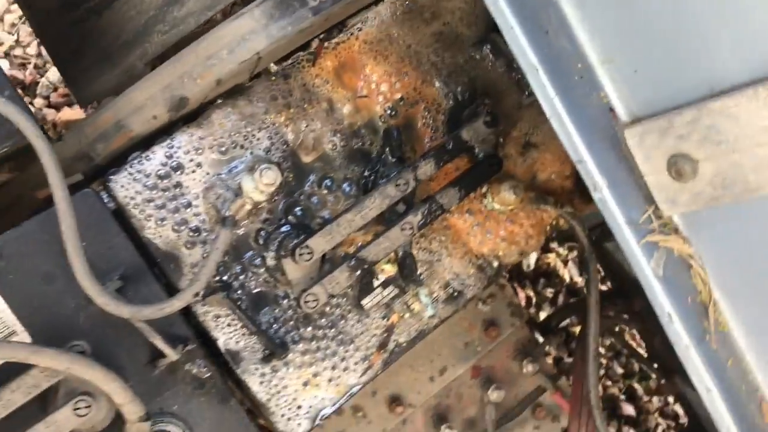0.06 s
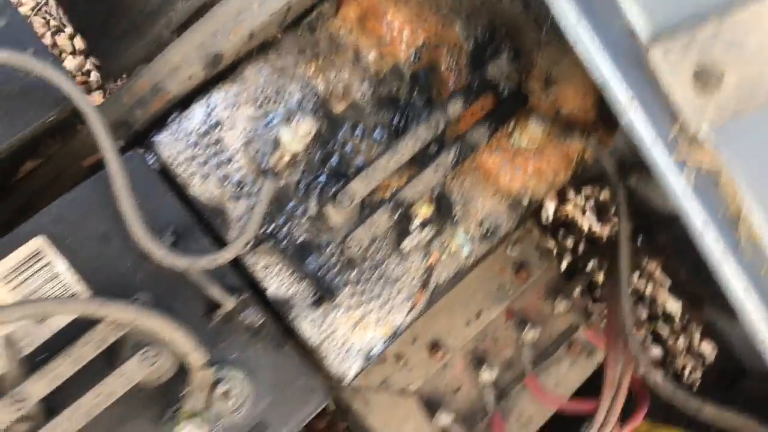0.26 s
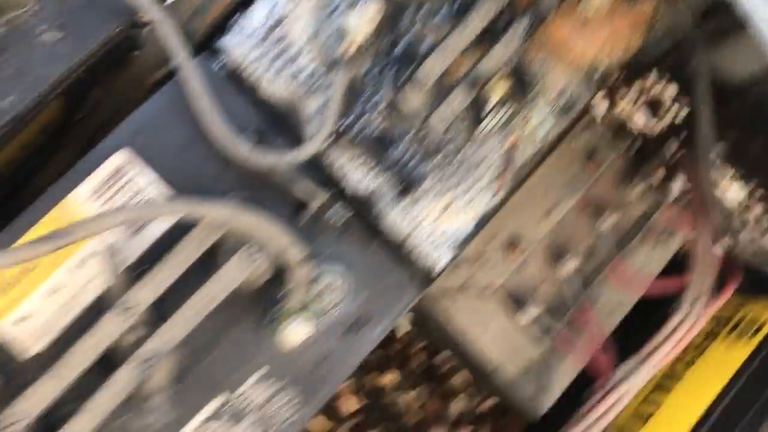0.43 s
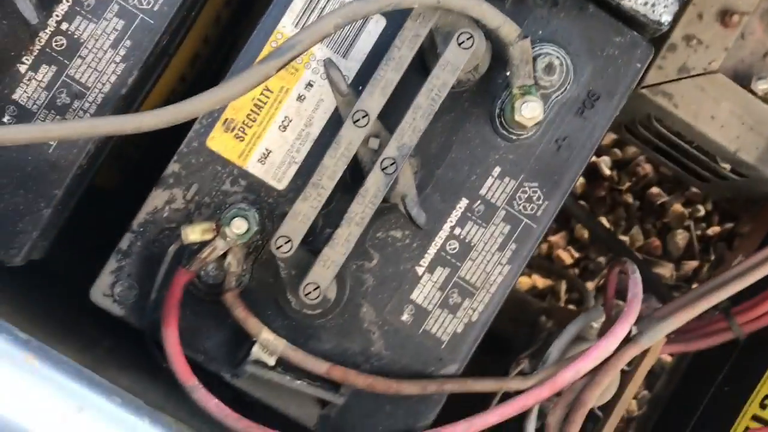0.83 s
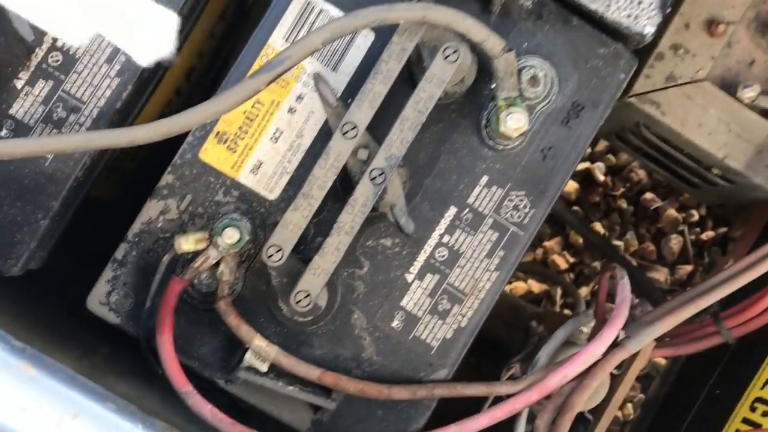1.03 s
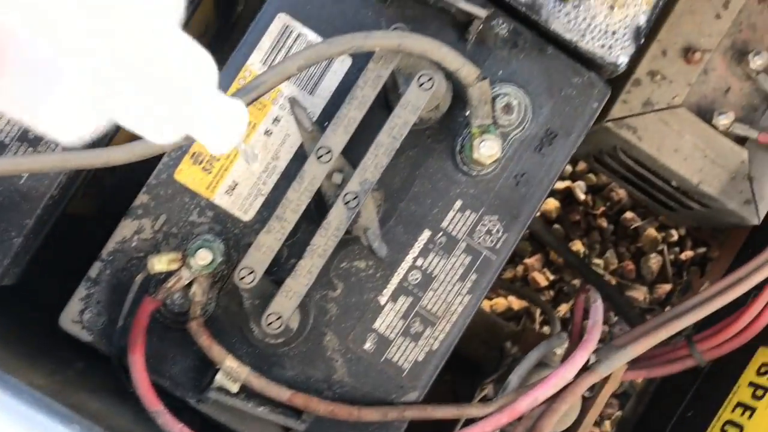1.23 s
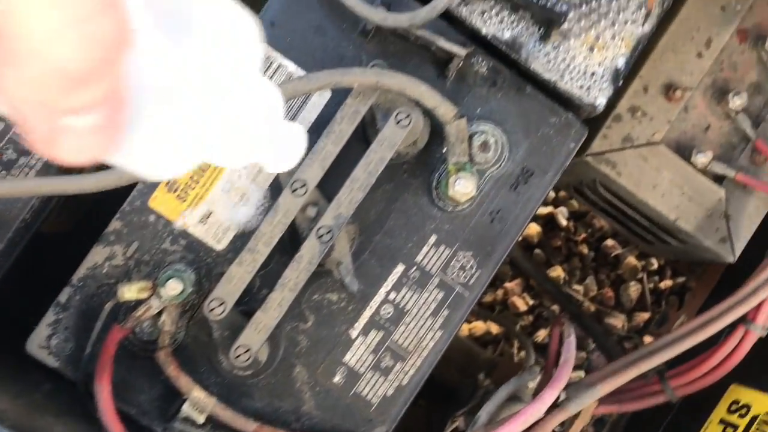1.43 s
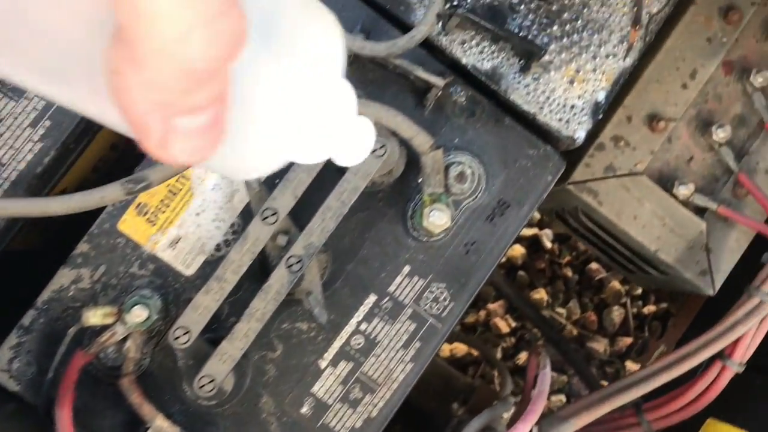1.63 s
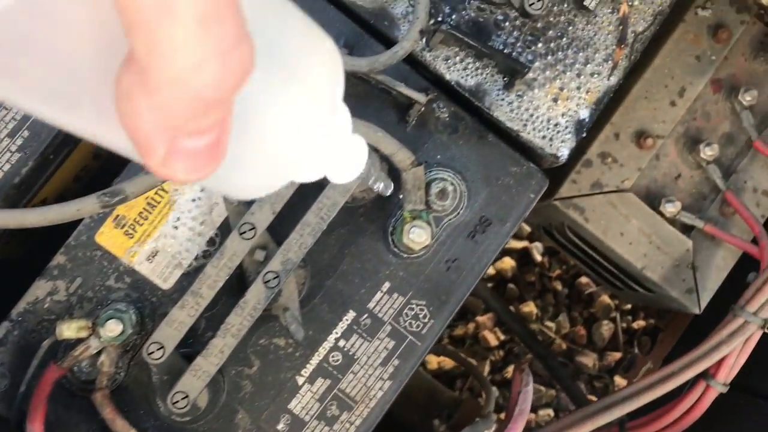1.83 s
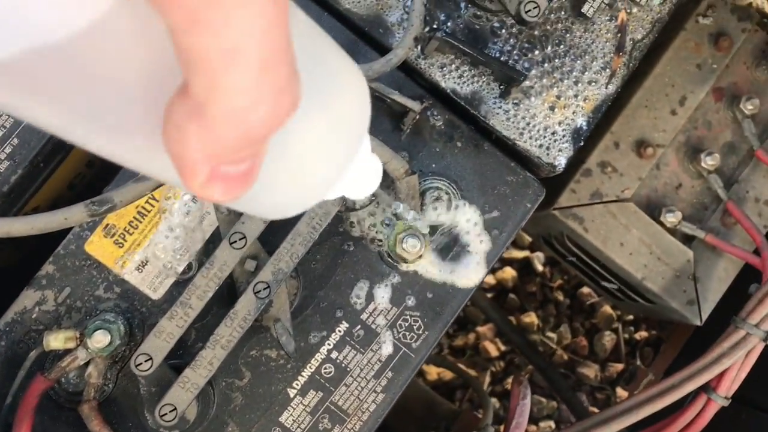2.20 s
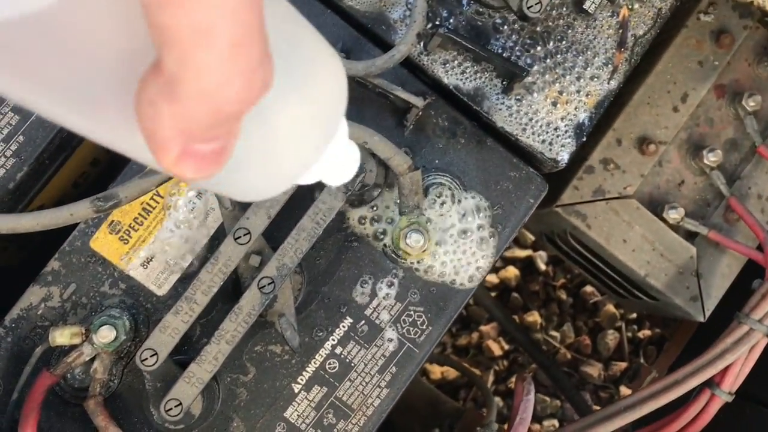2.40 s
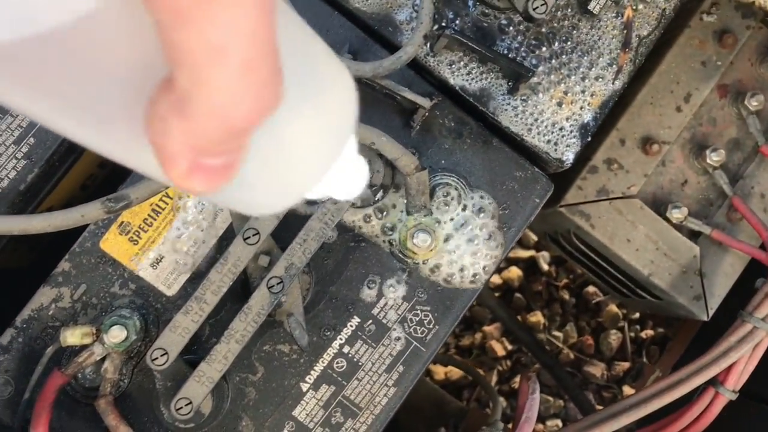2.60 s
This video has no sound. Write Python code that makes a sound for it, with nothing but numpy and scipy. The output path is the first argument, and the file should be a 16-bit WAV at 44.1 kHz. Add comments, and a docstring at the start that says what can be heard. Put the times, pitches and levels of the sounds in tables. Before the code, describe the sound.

Liquid fizzes and foams on a corroded battery terminal after a plastic bottle clunks.

```python
"""A plastic bottle clunks and scrapes as it is picked up, close by in a quiet garage, then clicks once
in the hand. Liquid runs onto a battery top, which fizzes thinly, then reaches the corroded terminal,
which foams in a full hiss. All the fizz is made of thousands of tiny bursting bubbles. Older foam
hisses faintly in the background, single bubbles pop, and handling bumps and ticks sit over a low
room rumble."""
import sys
import numpy as np
from scipy import signal
from scipy.fft import rfft, irfft
from scipy.io import wavfile
from scipy.ndimage import uniform_filter1d

SR = 44100
rng = np.random.default_rng(int(sys.argv[2]) if len(sys.argv) > 2 else 0)


def inscribe(sig):
    """Save sig as 16-bit PCM at rate SR to the path in sys.argv[1].

    A 1-D sig is mono; a 2-D sig holds one channel per row.
    Samples are clipped to [-1, 1] before scaling.
    """
    pcm = np.round(np.clip(np.atleast_2d(sig).T, -1, 1) * 32767)
    wavfile.write(sys.argv[1], SR, pcm.astype(np.int16))


N = 121275
TIME = np.arange(N) / SR


def amp(db):
    """Turns decibels into a gain."""
    return 10 ** (np.asarray(db) / 20)

def unit_level(x):
    """Scales a signal to an average (rms) level of one."""
    return x / np.sqrt(np.mean(x ** 2) + 1e-20)

def curve(points, t=TIME):
    """Joins points by straight lines in time."""
    return np.interp(t, *np.transpose(points))

def at_pitch(points, hz):
    """Joins points by straight lines, with octaves evenly spaced."""
    pitches, values = np.transpose(points)
    return np.interp(np.log(hz + 1), np.log(pitches + 1), values)

def add(mix, start_s, sound):
    """Mixes a sound in at a given time."""
    part = mix[max(round(start_s * SR), 0):][:len(sound)]
    part += sound[:len(part)]

def colour(x, tone):
    """Makes some pitches louder than others, at an overall level of one."""
    gain = amp(at_pitch(tone, np.fft.rfftfreq(len(x), 1 / SR)))
    return unit_level(irfft(rfft(x) * gain, len(x)))

def ringing_noise(tone, ring_times, hold_s=0):
    """Noise that holds, then dies away. A ring time is how long a fade of 60 dB takes."""
    hz, t, bands = signal.stft(colour(rng.standard_normal(SR // 2), tone), SR, nperseg=128)
    fade_db = -60 * np.maximum(t - hold_s, 0) / at_pitch(ring_times, hz)[:, None]
    return signal.istft(bands * amp(fade_db), SR, nperseg=128)[1]


# Tone of the room's rumble and of its air (pitch [Hz], level [dB])
RUMBLE_TONE = [(30, -37.5), (55, -8), (95, 0), (170, -5), (230, -3), (310, -11.5), (450, -24), (900, -48)]
AIR_TONE = [(150, 0), (400, 0), (700, 2), (1300, -2.5), (2200, -5.5), (3800, -7.5), (6000, -37.5),
            (15000, -37.5)]
# How each sinks, then comes up with the microphone's gain (time [s], level [dB])
RUMBLE_LEVEL = [(0, -58.5), (.3, -63.5), (.6, -70), (1.0, -71.5), (1.44, -72), (1.54, -63), (2.1, -64),
                (2.75, -63.5)]
AIR_LEVEL = [(0, -70), (.2, -71), (.36, -72), (.55, -77), (.9, -78.5), (1.44, -78), (1.58, -70.5),
             (2.75, -70.5)]

def room():
    """Low rumble and soft air noise, which sink, then come up as the microphone's gain rises."""
    rumble = amp(curve(RUMBLE_LEVEL)) * colour(rng.standard_normal(N), RUMBLE_TONE)
    air = amp(curve(AIR_LEVEL)) * colour(rng.standard_normal(N), AIR_TONE)
    return rumble + air


def bubbles(per_s=12000, ring_cycles=3.5, spread_db=-2.5, pitches=30):
    """Tiny bubbles burst at random, each ringing briefly at its own pitch."""
    # a negative spread makes a few bursts quieter, a positive one makes a few louder
    sizes = amp(spread_db * np.minimum(rng.exponential(1, N), 5))
    bursts = sizes * rng.choice([-1, 1], N) * (rng.random(N) < per_s / SR)
    pitch_index = rng.integers(0, pitches, N)
    out, t = np.zeros(N), TIME[:SR // 50]
    for k, hz in enumerate(np.linspace(1500, 16500, pitches) + rng.uniform(-60, 60, pitches)):
        ring = np.sin(2 * np.pi * hz * t) * np.exp(-t * hz / ring_cycles)
        out += signal.oaconvolve(bursts * (pitch_index == k), unit_level(ring))[:N]
    return unit_level(out)


# How loud the older foam sounds (time [s], level [dB])
OLD_FOAM_LEVEL = [(0, -74), (.2, -71), (.35, -72), (.52, -77), (.85, -78.5), (1.4, -78), (2.75, -55.5)]
# Its tone (pitch [Hz], level [dB])
OLD_FOAM_TONE = [(1470, -27.5), (2500, -4.5), (3780, 1.5), (6590, 4), (9510, 1.5), (10500, -3.5),
                 (11600, 0), (15500, -5.5)]

def old_foam():
    """Older foam hisses faintly in the background as its bubbles burst."""
    return amp(curve(OLD_FOAM_LEVEL)) * colour(bubbles(), OLD_FOAM_TONE)


# Handling bumps (time [s], level [dB], top of the strongest pitches [Hz], ring time [s])
BUMPS = [(.0, -57, 830, 0.21), (1.419, -60.5, 1590, 0.022), (2.291, -61.5, 1490, 0.088),
         (2.613, -66, 1310, 0.85), (2.636, -39.5, 130, 0.24), (2.718, -45, 111, 0.24)]

def bumps():
    """Handling makes soft thuds; a duller one swells more slowly."""
    out, t = np.zeros(N), TIME[:SR // 3]
    rise_cycles = 2.54
    for start_s, db, top_hz, ring_s in BUMPS:
        tone = [(25, -26), (top_hz * 0.6, 0), (top_hz, 0), (top_hz * 2, -17), (top_hz * 8, -48)]
        thud = colour(rng.standard_normal(len(t)), tone)
        swell = np.sin(np.pi / 2 * np.minimum(t * top_hz / rise_cycles, 1)) ** 2
        add(out, start_s, thud * amp(db - 60 * t / ring_s) * swell)
    return out


# The hollow bottle's own notes (pitch before gripping [Hz], relative level [dB], ring time [s])
BOTTLE_NOTES = [(226.9, -13.5, 0.3), (296.7, -5, 0.18), (383.3, -9, 0.15), (443.3, 6.5, 0.12),
                (497, -5, 0.11), (601, -13.5, 0.18), (778, 2.5, 0.062), (957, -1.5, 0.054),
                (1156, 8.5, 0.059), (1770, -13, 0.067), (2308, -2.5, 0.059)]
# Knocks; the grip lowers the notes (time [s], strength [dB], contact time [s], pitch factor [ratio])
KNOCKS = [(.015, -36, 0.0036, .85), (0.2007, -44.5, 0.0004, 0.96), (0.2185, -29, 0.000094, 0.99),
          (0.2362, -29, 0.0018, 0.96), (.264, -34, 0.0028, 0.91)]

def bottle_knocks():
    """Each knock rings the hollow bottle, too small to give bass; a longer contact is duller."""
    out, t = np.zeros(N), TIME[:SR // 3]
    rise_s, damp_from_s, damped_ring_s = 0.0055, 0.304, 0.092
    for start_s, db, contact_s, pitch_factor in KNOCKS:
        ring = np.zeros(len(t))
        for hz, note_db, ring_s in BOTTLE_NOTES:
            note = amp(note_db - 60 * t / ring_s) * np.sin(2 * np.pi * hz * pitch_factor * t)
            ring += note / (1 + (2 * hz * contact_s) ** 2)
        add(out, start_s, amp(db) * ring * np.minimum(t / rise_s, 1))
    damping = amp(-60 * np.maximum(TIME - damp_from_s, 0) / damped_ring_s)
    bass_cut = signal.butter(4, 188, "high", fs=SR, output="sos")
    return signal.sosfilt(bass_cut, out * damping)


# Handling ticks (time [s], level [dB])
TICKS = [(.101, -57.5), (.136, -57.5), (0.985, -68)]

def ticks(ring_s=0.024):
    """Light, dry touches each make a short snap of noise."""
    out, t = np.zeros(N), TIME[:SR // 10]
    for start_s, db in TICKS:
        snap = colour(rng.standard_normal(len(t)), [(7000, -3), (15000, -6)])
        add(out, start_s, snap * amp(db - 60 * t / ring_s))
    return out


# Single bubbles and, lower in pitch, light taps (time [s], level [dB], pitch [Hz])
POPS = [(.124, -59.5, 1700), (0.134, -52, 6860), (.351, -58, 1112), (1.547, -41, 12550), (1.688, -45, 7750),
        (1.957, -48, 8600), (1.981, -44.5, 10970), (2.18, -33, 14200), (2.24, -47, 3070),
        (2.476, -36, 8800), (2.725, -58, 6890)]

def pops(snap_db=-3, rise_s=0.0022):
    """A larger bubble or a light tap snaps and rings briefly."""
    out, t = np.zeros(N), TIME[:SR // 10]
    for start_s, db, hz in POPS:
        ring_s = 0.045 * (1000 / hz) ** 0.37  # higher pops die sooner
        tone = [(hz / 2, -24), (hz * .87, -20), (hz * .95, 0), (hz * 1.05, 0), (hz * 1.13, -22)]
        snap = colour(rng.standard_normal(len(t)), tone)
        pop = np.sin(2 * np.pi * hz * t) + amp(snap_db) * snap
        add(out, start_s, pop * amp(db - 60 * t / ring_s) * np.minimum(t / rise_s, 1))
    return out


# Tone of the scrape (pitch [Hz], level [dB])
SCRAPE_TONE = [(100, -45.5), (220, -2.5), (430, 4.5), (650, -1), (1100, 1.5), (3200, -2.5), (4800, -10.5),
               (6000, -9.5), (7300, -21.5), (9200, -25), (10700, -42.5), (15000, -51)]
# How long it rings (pitch [Hz], ring time [s])
SCRAPE_RING = [(250, 0.29), (1000, 0.19), (2500, 0.12), (9000, 0.083)]

def bottle_scrape(start_s=.1995, length_s=.027, rise_s=.003, grips_per_s=9000, db=-32.5, ring_db=-8.5):
    """The bottle grips and slips many times in a moment, leaving a dull ring."""
    t = TIME[:SR // 4]
    strengths = rng.standard_normal(len(t)).clip(-1, 1)
    gripping = (rng.random(len(t)) < grips_per_s / SR) & (t < length_s)
    grips = np.zeros(N)
    add(grips, start_s, strengths * gripping * np.minimum(t / rise_s, 1))
    rub = colour(grips, SCRAPE_TONE) * np.sqrt(length_s * SR / N)  # level of one over its short length
    tail = ringing_noise([(100, 0.0047), (10000, 0.0092)], SCRAPE_RING)
    ring = signal.fftconvolve(rub, tail / np.linalg.norm(tail))[:N]
    return amp(db) * (rub + amp(ring_db) * ring)


# Tone of the click (pitch [Hz], level [dB])
CLICK_TONE = [(1400, -32), (2100, 3), (2900, -2.5), (3900, -6), (4500, -41), (6300, -5.5), (7300, -37),
              (11000, -25), (12500, -13), (15500, -7.5)]
# How long it rings (pitch [Hz], ring time [s])
CLICK_RING = [(2200, 0.32), (3200, 0.09), (14000, 0.043)]

def bottle_click(start_s=.906, db=-61, creak_s=0.018):
    """The plastic gives one bright, creaky click in the hand."""
    out = np.zeros(N)
    add(out, start_s, amp(db) * ringing_noise(CLICK_TONE, CLICK_RING, hold_s=creak_s))
    return out


def flicker(shape, bands, steps):
    """Random ups and downs, smoothed over nearby pitch bands and time steps."""
    across_pitch = uniform_filter1d(rng.standard_normal(shape), bands, axis=0)
    return unit_level(uniform_filter1d(across_pitch, steps, axis=1))

def fizz(level, tone, lowest, brightness, steepness, cluster_db):
    """Bubbles burst in clusters of like size; as they grow, the hiss reaches lower pitches."""
    dry_bursts = bubbles()
    ringing_bursts = amp(-2.5) * bubbles(per_s=1300, ring_cycles=53, pitches=120)
    hiss = colour(dry_bursts + ringing_bursts, tone)
    hz, t, bands = signal.stft(hiss, SR, nperseg=256, noverlap=192)
    hz = hz[:, None] + 1
    clusters = cluster_db * flicker(bands.shape, bands=2, steps=22)
    sputter = 0.5 * flicker(bands.shape, bands=18, steps=6)  # quick and wide, in dB
    tilt = amp(curve(brightness, t) * np.log2(hz / 8000))
    low_cut = 1 / np.sqrt(1 + (curve(lowest, t) / hz) ** steepness)
    bands = bands * tilt * low_cut * amp(clusters + sputter)
    return amp(curve(level)) * signal.istft(bands, SR, nperseg=256, noverlap=192)[1][:N]


# How the fizz on the battery top swells and fades (time [s], gain [dB])
TOP_LEVEL = [(1.37, -92), (1.42, -73), (1.458, -68), (1.482, -60), (1.555, -53.5), (1.62, -56), (1.68, -54),
             (1.81, -57), (1.89, -63), (2.05, -65.5)]
# Its basic tone (pitch [Hz], level [dB])
TOP_TONE = [(3000, -15), (4800, -15.5), (5400, -8), (7900, -11), (8600, 2.5), (9300, 2.5), (10500, -7.5),
            (11700, -1.5), (14000, -7), (15500, -4.5)]
# The note of its largest bubbles (time [s], pitch [Hz])
TOP_LOWEST = [(1.45, 13000), (1.485, 8400), (1.56, 5660), (1.67, 4800), (2.05, 5050)]
# How bright it is (time [s], treble lift [dB per octave])
TOP_BRIGHTNESS = [(1.5, 5), (1.68, -4), (1.75, -3.5), (1.9, -7.5)]

def battery_top_fizz():
    """Liquid runs onto the battery top and fizzes thinly."""
    return fizz(TOP_LEVEL, TOP_TONE, TOP_LOWEST, TOP_BRIGHTNESS, steepness=6.3, cluster_db=3.0)


# How the foam on the terminal swells and fades (time [s], gain [dB])
FOAM_LEVEL = [(2.06, -100), (2.078, -50.5), (2.1, -42), (2.15, -43), (2.24, -44), (2.29, -42),
              (2.40, -41.5), (2.5, -47), (2.6, -53), (2.75, -56.5)]
# Its basic tone (pitch [Hz], level [dB])
FOAM_TONE = [(3000, -1), (3350, -6.5), (3950, 1.5), (4800, -4.5), (5250, -2), (5700, -4), (6500, -1.5),
             (9010, -3), (9580, 1), (10400, -4.5), (14000, -9.5)]
# The note of its largest bubbles (time [s], pitch [Hz])
FOAM_LOWEST = [(2.07, 3740), (2.2, 3570), (2.26, 2890), (2.39, 2780), (2.55, 3180), (2.75, 3350)]
# How bright it is (time [s], treble lift [dB per octave])
FOAM_BRIGHTNESS = [(2.07, -1), (2.12, 3.5), (2.3, 1), (2.43, -1.6), (2.75, -5.5)]

def terminal_foam():
    """The liquid reaches the corroded terminal and foams in a full hiss."""
    return fizz(FOAM_LEVEL, FOAM_TONE, FOAM_LOWEST, FOAM_BRIGHTNESS, steepness=23.7, cluster_db=2.5)


# How loud the crackle is (time [s], level added to FOAM_LEVEL [dB])
CRACKLE_LEVEL = [(2.35, -13.5), (2.62, -5.5)]
# Its tone (pitch [Hz], level [dB])
CRACKLE_TONE = [(3000, -28), (7000, -4), (15000, -6)]

def crackle():
    """Larger bubbles burst over the foam's hiss and stand out as it dies down."""
    bursts = bubbles(per_s=280, ring_cycles=53, spread_db=1.5, pitches=40)
    return amp(curve(FOAM_LEVEL) + curve(CRACKLE_LEVEL)) * colour(bursts, CRACKLE_TONE)


def scene():
    """All the sounds meet at one close microphone."""
    mix = room() + old_foam() + bumps() + bottle_knocks() + ticks() + pops()
    mix += bottle_scrape() + bottle_click() + battery_top_fizz() + terminal_foam() + crackle()
    return mix[None]

def record(dry, top_hz=15800):
    """Cuts away the very highest treble."""
    treble_cut = signal.firwin(511, top_hz, window=("kaiser", 9), fs=SR)
    return signal.oaconvolve(dry, treble_cut[None], "same")


dry = scene()
out = record(dry)
inscribe(out)
```